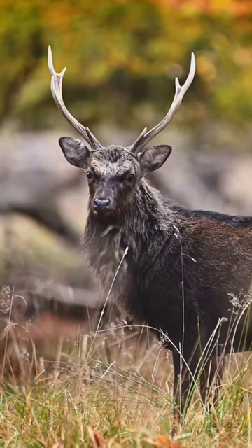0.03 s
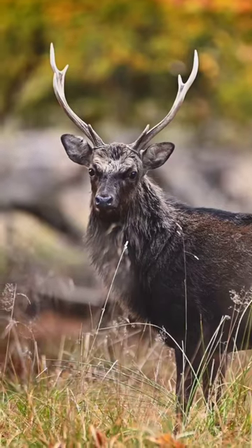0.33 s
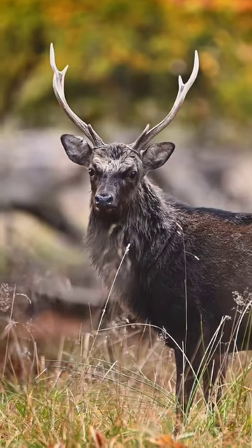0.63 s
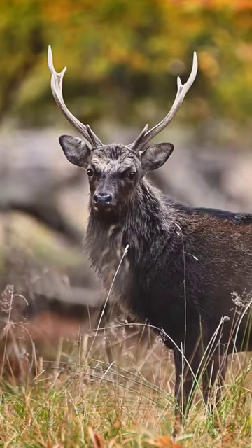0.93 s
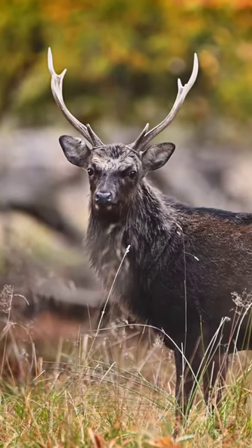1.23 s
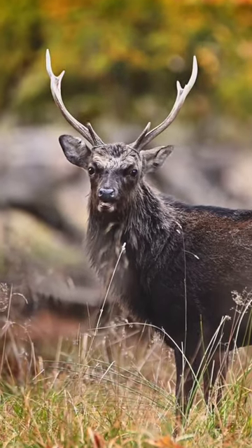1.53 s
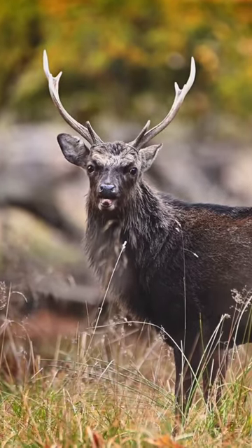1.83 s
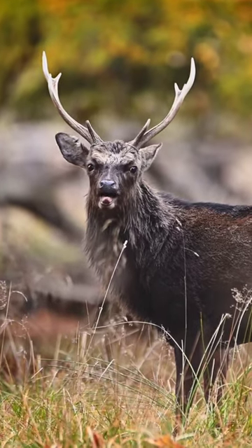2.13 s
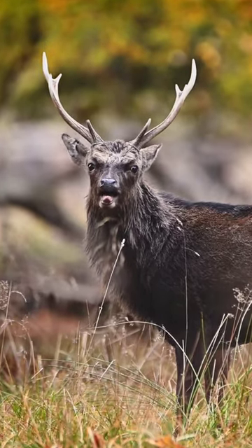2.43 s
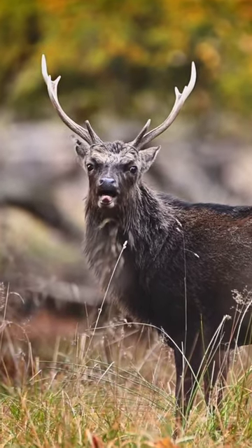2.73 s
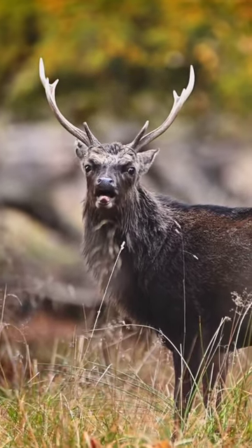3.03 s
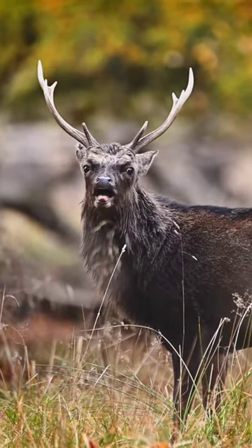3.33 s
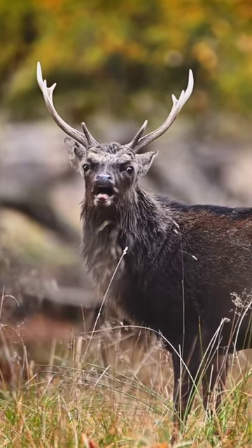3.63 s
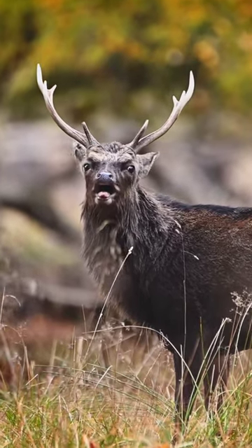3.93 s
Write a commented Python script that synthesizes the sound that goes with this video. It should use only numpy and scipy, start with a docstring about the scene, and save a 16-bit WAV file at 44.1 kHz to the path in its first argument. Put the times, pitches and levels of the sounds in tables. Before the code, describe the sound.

A stag gives one long whistling call outdoors. At first there is only soft hiss, a low rumble and faint grass rustles. At about 1.5 seconds two small clicks come just before the high call begins. It swells and rises slightly until 2.1 seconds, turns rough, then glides down about an octave with a thin echo, loudest around 3.4 seconds and still sounding at 4 seconds.

```python
"""A stag gives one long whistling call in open parkland: a harmonic series that swells, arches
and glides down an octave. A second vibration in the throat joins at the top of the arch and breaks
off; lower down, faint subharmonics split the voice, and turbulence makes it hoarse.
Two small clicks come just before the call, and reflection from trees returns a thin echo.
Soft hiss, rustles, a hollow rush and a rumble lie underneath."""
import sys
import numpy as np
from scipy import signal
from scipy.fft import rfft, irfft
from scipy.io import wavfile

SR = 44100
rng = np.random.default_rng(int(sys.argv[2]) if len(sys.argv) > 2 else 0)


def master_out(mix):
    """Clip the mix to full scale and print it as 16-bit PCM to the path in sys.argv[1]."""
    frames = np.transpose(np.atleast_2d(mix))
    ceiling = np.clip(frames, -1, 1)
    pcm = np.round(ceiling * 32767).astype(np.int16)
    wavfile.write(sys.argv[1], SR, pcm)


N = 176400
TIME = np.arange(N) / SR
SIDES = np.array([[.5], [-.5]])  # splits a difference between left and right
CALL_START_S, SHIMMER_HZ = 1.53, 22.3


# Fundamental of the call: time_s, pitch_hz
WHISTLE_PITCH = [(1.54, 2212), (1.62, 2328), (1.8, 2386), (2.08, 2513), (2.22, 2479), (2.42, 2461),
                 (2.53, 2414), (2.7, 2300), (2.85, 2161), (3.03, 2046), (3.24, 1877), (3.31, 1781),
                 (3.35, 1687), (3.45, 1663), (3.59, 1603), (3.75, 1434), (3.91, 1338), (4.0, 1215)]
# Harmonic envelopes: time_s, first_db, second_db, third_db, higher_base_db
HARMONIC_LEVELS = [(1.572, -38, -64, -62, -70), (1.595, -29.5, -40.5, -48, -48),
                   (1.86, -25.0, -30.5, -37.5, -54), (1.92, -22.5, -32.5, -45.0, -46.5),
                   (2.06, -18, -32.5, -39, -39.5), (2.48, -16.5, -30, -34, -35.5),
                   (2.55, -17, -25, -39, -37), (2.68, -19.5, -29.5, -29.0, -34),
                   (2.81, -19.5, -34.5, -39.5, -37), (3.0, -19.5, -26, -31.0, -40),
                   (3.15, -18.5, -30, -57, -35.5), (3.21, -18, -31, -43.0, -31),
                   (3.28, -17, -32.5, -45.5, -54.5), (3.35, -9.5, -29, -47, -44.5),
                   (3.51, -11.0, -24.5, -48.5, -46.5), (3.62, -14.0, -19, -40.5, -44),
                   (3.74, -21, -24.5, -43, -46), (3.87, -22.5, -22.5, -30, -38.5),
                   (4.0, -27.5, -14.5, -36.5, -47)]
# Envelope of the partials midway between harmonics: time_s, base_level_db
SUBHARMONIC_LEVEL = [(3.2, -70), (3.38, -39.5), (3.52, -41), (3.65, -51), (4.0, -48)]
# Throat response, shaping higher harmonics and subharmonics: frequency_hz, gain_db
THROAT_RESPONSE = [(3000, 0.5), (5000, -35), (5900, -15), (6600, -5), (7300, 3), (8200, -5.5),
                   (9000, -11.5), (9900, -2.5), (11400, -3.5), (12400, -17)]

def whistle(attack_s=.025):
    """Periodic vibration gives harmonics; period doubling adds partials between them as the pitch falls."""
    hz, = in_time(WHISTLE_PITCH)
    first_db, second_db, third_db, higher_db = in_time(HARMONIC_LEVELS)
    subharmonic_db, = in_time(SUBHARMONIC_LEVEL)
    phase = phase_of(hz)
    overtone_dbs = [second_db, third_db]
    for k in range(4, 10):
        loss_db = 1.5 * (k % 2 == 0) + 1.5 * max(k - 5, 0)  # even and high harmonics are weaker
        overtone_dbs.append(higher_db + at_hz(THROAT_RESPONSE, k * hz) - loss_db)
    voice = partial(phase, 1, first_db)
    for k, db in enumerate(overtone_dbs, start=2):
        voice += partial(phase, k, db + 2.5 * drift(SHIMMER_HZ))
    for k in range(1, 8):
        db = subharmonic_db + at_hz(THROAT_RESPONSE, (k + .5) * hz) - 2.5 * (k - 1)
        voice += partial(phase, k + .5, db + 2 * drift(26))
    shimmer = from_db(.71 * drift(SHIMMER_HZ))
    attack = np.clip((TIME - CALL_START_S) / attack_s, 0, 1)
    return voice * shimmer * attack


# Second voice in the throat: time_s, pitch_hz, octave_db, third_harmonic_db
SECOND_VOICE = [(2.142, 2042, -28, -56), (2.157, 2237, -22, -21), (2.205, 2194, -25, -30),
                (2.27, 2272, -26, -35), (2.315, 2186, -39, -33.5), (2.365, 2156, -22, -28),
                (2.42, 2206, -32.5, -36), (2.47, 2170, -27, -28.5), (2.505, 2068, -27.5, -51),
                (2.61, 2067, -34, -45), (2.71, 1974, -35, -53)]

def second_voice(fall_db=13.5):
    """Biphonation: an independent vibration adds its own harmonics, mostly strongest at the octave."""
    hz, octave_db, third_db = in_time(SECOND_VOICE)
    phase = phase_of(hz, roughness=.96)
    levels = [octave_db - fall_db, octave_db] + [third_db - fall_db * k for k in range(3)]
    voice = sum(partial(phase, k, db + 3 * drift(SHIMMER_HZ)) for k, db in enumerate(levels, start=1))
    return gate(SECOND_VOICE) * voice


# Faint tone climbing as the call swells: time_s, pitch_hz, level_db
RISING_GLIDE = [(1.82, 2730, -68), (1.94, 3040, -42), (2.04, 3210, -47)]

def rising_tone():
    """Random frequency modulation makes a single climbing sinusoid unsteady."""
    hz, db = in_time(RISING_GLIDE)
    return gate(RISING_GLIDE) * partial(phase_of(hz, roughness=2.8), 1, db)


# Envelope of the hoarseness: time_s, level_db
RASP_LEVEL = [(1.59, -60), (1.615, -38), (1.65, -48), (1.96, -43.5), (2.025, -35.5), (2.08, -51),
              (2.9, -49), (3.3, -41), (3.42, -48), (4.0, -43)]
# Spectrum of its hiss: frequency_hz, relative_density_db
RASP_SPECTRUM = [(1000, -20), (2300, -6), (3200, 0), (4200, -3), (5200, -17), (12000, -17)]

def rasp(ring_ratio=1.4, ring_width_hz=600):
    """Turbulence in the throat gives broadband hiss and a narrow ring that glides above the whistle."""
    db, = in_time(RASP_LEVEL)
    hz, = in_time(WHISTLE_PITCH)
    turbulence = lowpass(rng.standard_normal(N), ring_width_hz / 2)
    ring = unit_rms(turbulence * np.sin(phase_of(ring_ratio * hz)))
    envelope = (TIME > CALL_START_S) * from_db(db + drift(42))
    return envelope * (noise(RASP_SPECTRUM, correlation=.37) + from_db(-1) * ring)


# Single reflections from nearby trunks: delay_s, gain_db
TRUNK_REFLECTIONS = [(.023, -19), (.0585, -26), (.1175, -24)]

def tree_echo(voice, t60_s=1.05, tail_delay_s=.03, tail_db=-11):
    """Reflection from trees: a few discrete echoes and a diffuse tail that decays exponentially."""
    tail = rng.standard_normal((2, N)) * from_db(-60 * TIME / t60_s) * (TIME > tail_delay_s)
    tail /= np.sqrt(np.sum(tail ** 2, axis=1, keepdims=True))
    dulled = lowpass(voice, cutoff_hz=13200)
    early = sum(from_db(db) * np.pad(dulled, ((0, 0), (int(delay_s * SR), 0)))[:, :N]
                for delay_s, db in TRUNK_REFLECTIONS)
    return early + from_db(tail_db) * signal.fftconvolve(dulled, tail, axes=1)[:, :N]


# Clicks before the call: start_s, level_db
CLICK_EVENTS = [(1.5114, -26), (1.5286, -14)]

def clicks(snap_hz=2640, thud_hz=185, decay_s=.0008):
    """Damped transients: each click is a noise burst with a woody snap and a small low thud."""
    out = np.zeros(N)
    for start_s, db in CLICK_EVENTS:
        age = np.maximum(TIME - start_s, 0)
        snap = np.sin(2 * np.pi * snap_hz * age)
        crack = .5 * (rng.standard_normal(N) + snap) * np.exp(-age / decay_s)
        thud = -from_db(-10) * np.sin(2 * np.pi * thud_hz * age) * np.exp(-age * thud_hz)
        out += (TIME >= start_s) * from_db(db) * (crack + thud)
    return out * from_db(-6 * SIDES)  # toward the right


# Soft rustles in the grass: centre_s, half_length_s, level_db
GRASS_RUSTLES = [(0.484, 0.0048, -36.5), (0.85, 0.31, -41)]
# Spectra of the rustles and the steady hiss: frequency_hz, relative_density_db
GRASS_SPECTRUM = [(2800, 0.5), (5500, -7), (8500, -17)]
HISS_SPECTRUM = [(450, -0.5), (1400, 1), (2400, 4.5), (4000, 1.5), (4900, -12.5), (5800, -10), (8000, -7.5),
                 (10000, -8.5), (11600, -26), (12300, -27)]

def hiss_and_rustles(lag_samples=8):
    """Time and level differences place the noise to the right: the left side is later and weaker."""
    swells = sum(from_db(db) * np.exp(-((TIME - centre_s) / half_length_s) ** 2)
                 for centre_s, half_length_s, db in GRASS_RUSTLES)
    hiss = from_db(-38.5) * noise(HISS_SPECTRUM, correlation=.83)
    left, right = hiss + swells * noise(GRASS_SPECTRUM, correlation=.83)
    return np.array([from_db(-2) * np.roll(left, lag_samples), right])


# Envelope of the far-off rush, fading as the call peaks: time_s, level_db
RUSH_ENVELOPE = [(2.03, -45), (2.25, -106)]
# Spectra of the rush and the rumble: frequency_hz, relative_density_db
RUSH_SPECTRUM = [(170, 4.5), (260, 14.5), (400, 2), (880, 2.5), (1190, 13.5), (1650, -13)]
RUMBLE_SPECTRUM = [(36, -7), (60, -4), (150, -17), (380, -24), (700, -44.5)]

def rush_and_rumble():
    """Spectral shaping: noise with two peaks sounds hollow, and noise weighted to the bass rumbles."""
    rush_db, = in_time(RUSH_ENVELOPE)
    rush = from_db(rush_db) * noise(RUSH_SPECTRUM, correlation=.96)
    return rush + from_db(-44) * noise(RUMBLE_SPECTRUM, correlation=1)


def from_db(db):
    """Decibels to amplitude ratio."""
    return 10 ** (np.asarray(db) / 20)


def unit_rms(x):
    """Normalisation to unit power."""
    return x / np.sqrt(np.mean(x ** 2) + 1e-20)


def lowpass(x, cutoff_hz):
    """Second-order attenuation above the cutoff."""
    return signal.sosfilt(signal.butter(2, cutoff_hz, fs=SR, output="sos"), x)


def in_time(rows):
    """Linear interpolation of each column at every sample."""
    times, *columns = np.transpose(rows)
    return [np.interp(TIME, times, column) for column in columns]


def at_hz(spectrum, hz):
    """Interpolation of a spectrum on a log-frequency axis."""
    frequencies, db = np.transpose(spectrum)
    return np.interp(np.log(hz + 1e-9), np.log(frequencies), db)


def gate(rows, fade_s=.008):
    """A time window spanning a table, with short linear edges."""
    return np.clip(np.minimum(TIME - rows[0][0], rows[-1][0] - TIME) / fade_s + .5, 0, 1)


def drift(rate_hz):
    """Low-passed noise gives slow random modulation of unit spread."""
    pole = np.exp(-80 * np.pi * rate_hz / SR)  # one step per 40 samples
    slow = signal.lfilter([1], [1, -2 * pole, pole * pole], rng.standard_normal(N // 40 + 2002))[2000:]
    return np.interp(np.arange(N) / 40, np.arange(len(slow)), unit_rms(slow))


def noise(spectrum, correlation):
    """Coloured noise of unit power; the mid-side balance sets the left-right correlation."""
    hz = np.fft.rfftfreq(N, 1 / SR)
    colour = from_db(at_hz(spectrum, hz)) * np.minimum(hz / spectrum[0][0], 1) ** 2
    mid, side = irfft(rfft(rng.standard_normal((2, N))) * colour, N)
    return unit_rms(np.sqrt(1 + correlation) * mid + np.sqrt(1 - correlation) * side * [[1], [-1]])


def phase_of(hz, roughness=1):
    """Phase is the integral of frequency, here with slight jitter."""
    return 2 * np.pi * np.cumsum(hz * (1 + .0013 * roughness * drift(30))) / SR


def partial(phase, multiple, rms_db, left_lead_s=.000016, wander_hz=10):
    """One sinusoid; drifting level and phase differences make it flutter between the sides."""
    gain = from_db(rms_db + SIDES * .7 * multiple * drift(wander_hz))
    lead_rad = left_lead_s * SR * np.gradient(phase) + .15 * drift(wander_hz)
    return np.sqrt(2) * gain * np.sin(multiple * (phase + SIDES * lead_rad))


# Direction of the call's tones: time_s, left_minus_right_db
CALL_DIRECTION = [(1.6, 2.5), (2.3, -4.5), (2.7, 2.5), (3.4, 0.5), (4.0, 0.5)]

def scene():
    """Superposition of the stag, its echo, the clicks and the background."""
    pan_db, = in_time(CALL_DIRECTION)
    tones = whistle() + second_voice() + rising_tone()
    stag = tones * from_db(pan_db * SIDES) + rasp()
    return stag + tree_echo(stag) + clicks() + hiss_and_rustles() + rush_and_rumble()


def record(dry, opening_s=.115, stopband_hz=13900):
    """Gating and band limiting: a moment of silence opens the sound, and the top treble is cut."""
    treble_cut = signal.cheby2(16, 70, stopband_hz, fs=SR, output="sos")
    return signal.sosfilt(treble_cut, dry * (TIME > opening_s))


dry = scene()
out = record(dry)
master_out(out)
```